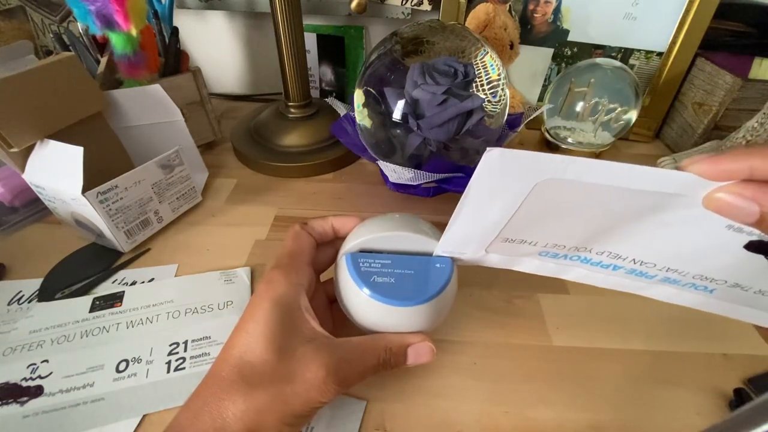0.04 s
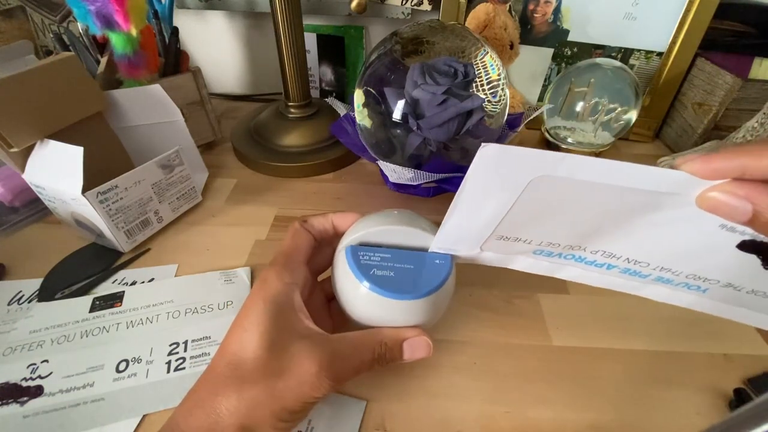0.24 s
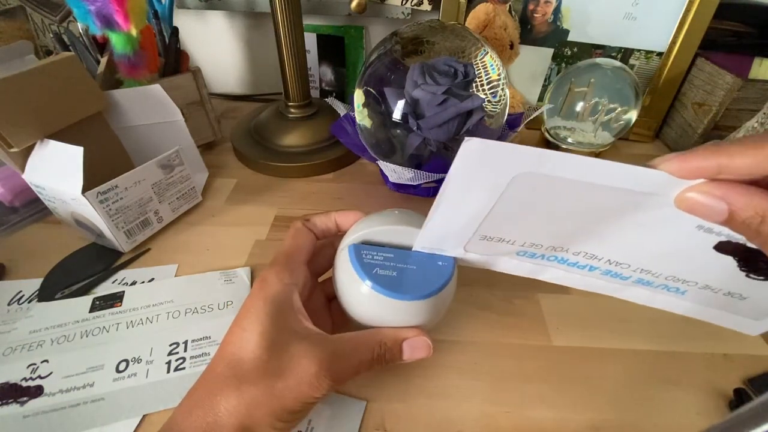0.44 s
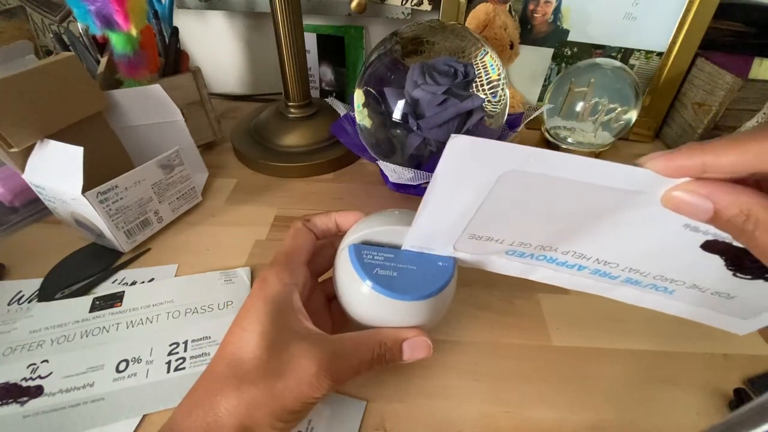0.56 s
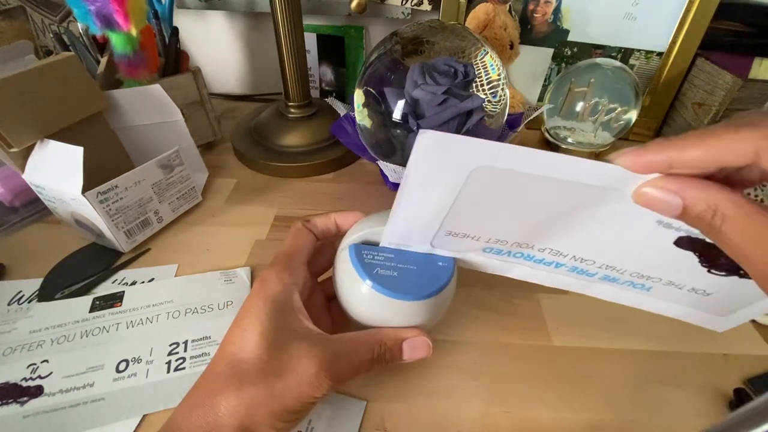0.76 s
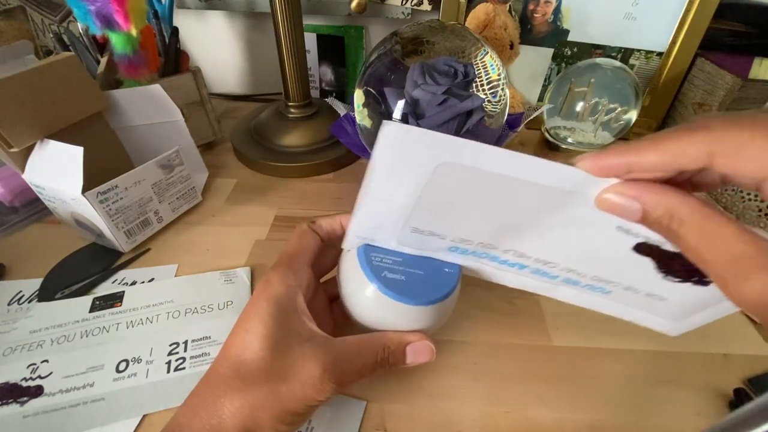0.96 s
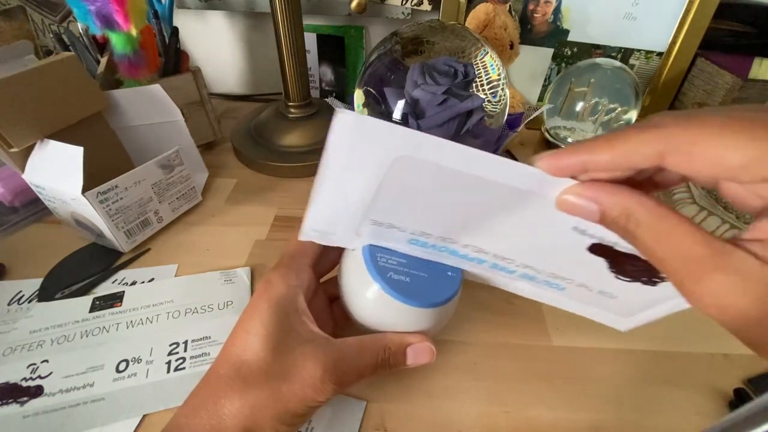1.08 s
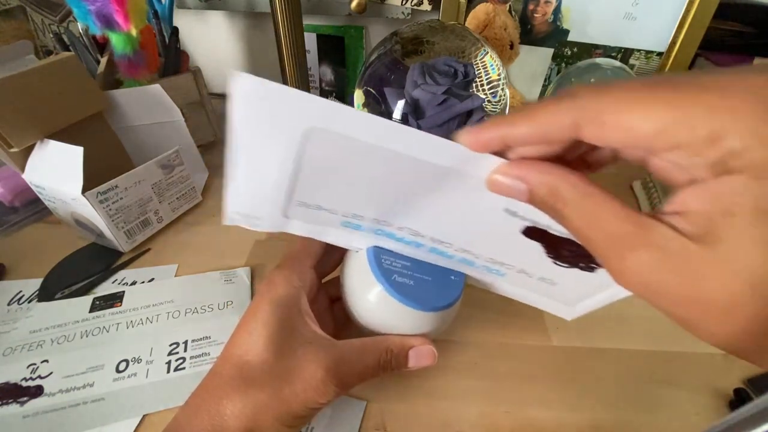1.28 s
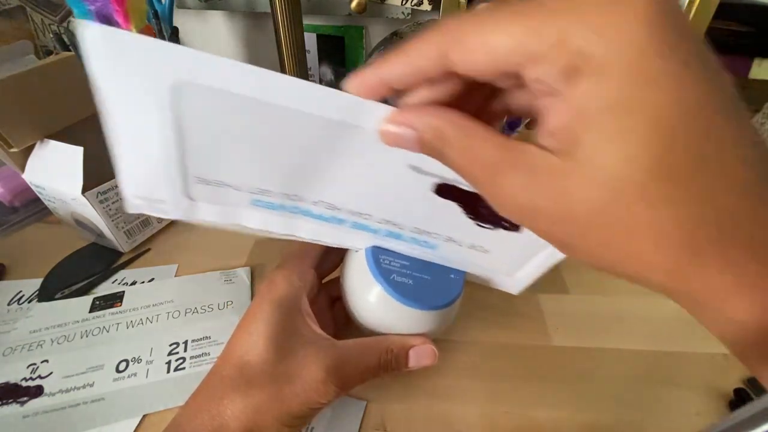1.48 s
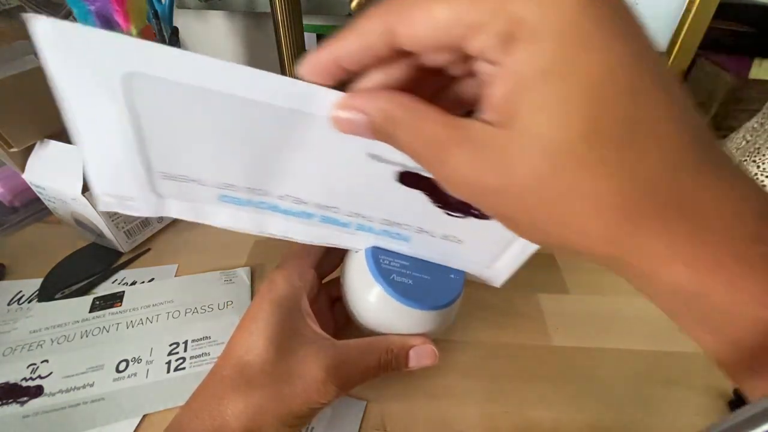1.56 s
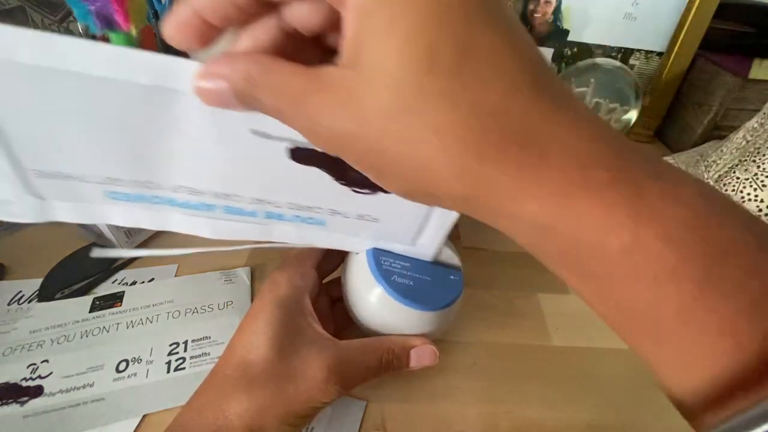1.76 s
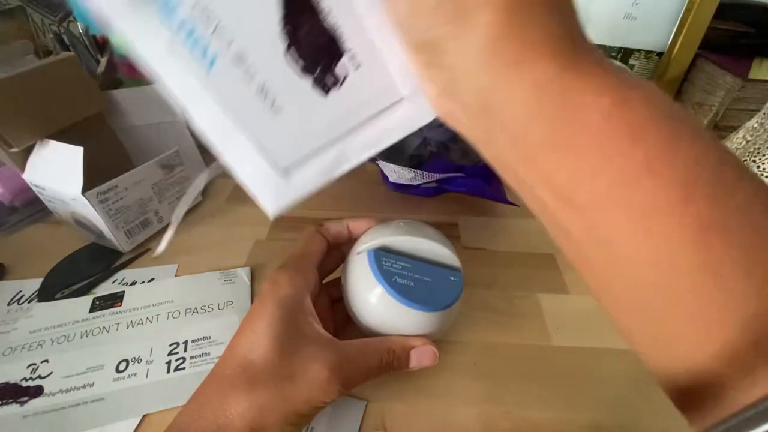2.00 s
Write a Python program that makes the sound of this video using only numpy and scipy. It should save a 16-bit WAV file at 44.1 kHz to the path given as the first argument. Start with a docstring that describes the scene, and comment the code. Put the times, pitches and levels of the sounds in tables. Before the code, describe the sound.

A small battery letter opener whirs and rattles briefly, slitting an envelope with a papery rasp.

```python
"""A faint rustle and squeak: an envelope slides into a battery letter opener, its corner knocking the slot twice.
It trips the motor; plastic gears whine and rattle in the shell, binding once per turn of the feed roller,
while noise of rubbed fibres, snaps and cracks makes the slit paper. The trailing edge swishes out, the motor slows.
Place: a wooden desk in a small room with a faint mains hum. Distance: close, the direct sound well above the room.
Microphone: stereo, with uneven treble and a steep upper limit."""
import sys
import numpy as np
from scipy import signal
from scipy.fft import rfft, irfft, next_fast_len
from scipy.io import wavfile
from scipy.ndimage import uniform_filter1d

SR = 44100
rng = np.random.default_rng(int(sys.argv[2]) if len(sys.argv) > 2 else 0)


def to_wav(s):
    """Save 16-bit WAV."""
    ch = np.atleast_2d(s).T  # columns
    pcm = np.round(np.clip(ch, -1, 1) * 32767)  # PCM
    wavfile.write(sys.argv[1], SR, pcm.astype(np.int16))


N = 89567

# --- Place and microphone
# room background colour: pitch_hz, level_db
ROOM_COLOUR = [(20, -22), (35, -13), (50, 6), (90, -4), (160, -10), (330, -13), (550, -24.5), (1500, -29),
               (6000, -40), (16000, -43)]
ROOM_DB, HUM_HZ, HUM_DB = -64.5, 121, -68.5  # HUM_DB is the middle of its waver
# microphone treble response: pitch_hz, level_db
MIC_RESPONSE = [(20, -0.5), (10300, 0.5), (11500, -12.5), (12800, -32), (13700, 5.5), (14700, 4.5),
                (15500, 0)]
TOP_HZ = 15500
# low thud as the opener shifts on the desk
BUMP_S, BUMP_LENGTH_S, BUMP_HZ, BUMP_DB = 1.015, 0.064, 48, -42.5

# --- Envelope entering the slot
# slide level: start_s, level_db
SLIDE_LEVEL = [(0, -91), (.19, -87.5), (.235, -70.5), (.31, -69.5), (.37, -71), (.45, -77), (.51, -79.5),
               (.56, -71.5), (.61, -72), (.66, -68.5), (.715, -74), (.75, -95)]
# slide colour: pitch_hz, level_db
SLIDE_COLOUR = [(200, -29), (1100, -12), (1580, -7), (2000, -8), (2650, 3), (3400, -0.5), (4500, -1.5),
                (5700, -2), (7200, -3.5), (8800, -4), (11000, -9), (16000, -17)]
# slot resonances: pitch_hz, width_hz, level_db; pitch before the rise, level before swell and slide level
SLOT_MODES = [(1590, 200, -14), (2330, 760, -8.5), (5640, 1100, -8)]
# slot resonances rise as the envelope goes deeper: start_s, frequency_ratio
SLOT_RISE = [(.22, 1.03), (.42, 1.05), (.56, 1.14), (.7, 1.17)]
# faint squeak of the entering paper's edge: start_s, level_db
SQUEAK_LEVEL = [(0, -85), (.15, -82), (.23, -75), (.38, -80), (.43, -85), (.5, -120)]
SQUEAK_HZ, SQUEAK_WIDTH_HZ = 1575, 130
# corner knocks on the slot: start_s, click_db, hollow_thump_db, ring_hz, ring_db
CORNER_TAPS = [(.388, -53, -70, 1470, -54.5), (0.635, -57, -61, 2700, -57)]

# --- Paper at the rollers and blade
# paper dragged past the blade: start_s, level_db
PAPER_LEVEL = [(.7, -120), (.724, -57), (.74, -46), (.79, -28.5), (1.3, -33), (1.86, -32.5), (1.95, -38),
               (2.03, -42.5)]
# paper colour: pitch_hz, level_db
PAPER_COLOUR = [(200, -18.5), (1100, -14), (1580, -6), (2000, 0.5), (2650, 10.5), (3400, 4), (4400, -15),
                (5700, 1.5), (7200, -17), (8800, -6.5), (11000, -22), (16000, -3)]
# the blade is in the paper between these times
CUT_FROM_S, CUT_TO_S, CUT_FADE_S = .85, 1.875, 0.024
# low flutter of the envelope while slit: pitch_hz, level_db
SHEET_COLOUR = [(60, -17), (160, -14.5), (250, 1.5), (310, -6), (390, 3), (480, -3.5), (700, -11),
                (1200, -0.5), (2000, -31), (8000, -32)]
# fibres snapping at the blade: pitch_hz, level_db
SNAP_COLOUR = [(200, -22), (1200, -6), (3000, -3), (6200, 1), (9000, 3.5), (12000, -4), (14700, 7),
               (16000, -8)]
SHEET_DB, SNAP_DB = -46, -36.5
# small cracks in the gripped paper
CRACKS_PER_S, CRACK_SPREAD_DB = 70, 4
# the trailing edge swishes out
EXIT_S, EXIT_T60_S, EXIT_HZ, EXIT_DB = 1.848, 0.29, 5800, -24
# the rollers seize the paper, then the blade bites: start_s, length_s, pitch_hz, level_db
LOAD_BITES = [(0.763, 0.012, 660, -26.5), (0.854, 0.018, 670, -27.5)]

# --- Motor, gears and shell
MOTOR_ON_S = .72
# tooth rate of the first gear, before drift and sag: start_s, tooth_rate_hz
MOTOR_SPEED = [(.722, 453.7), (.742, 1150), (.757, 1708), (.776, 2087), (.792, 2125), (.808, 2296),
               (.87, 2314), (1.05, 2307), (1.3, 2311), (1.62, 2319), (1.858, 2328), (1.878, 2052),
               (1.905, 1861), (1.94, 1452), (1.987, 1136), (2.03, 890)]
# drive level of each layer, added to that layer's own level: start_s, rattle_db, whine_db, growl_db
DRIVE_LEVEL = [(.718, -26, -50, -39), (.731, -22, -18, -4), (.741, -5, 4.5, 3.5), (.757, -2.5, -2, 0),
               (.778, 1.5, 8, 6), (.82, -0.5, 0, 1.5), (.86, -2, 0, 2), (.91, 0.5, 7, 1.5),
               (.97, 0.5, -3.5, -1.5), (1.04, -2, -1.5, -1.5), (1.1, -1.5, -8, -0.5),
               (1.19, -2.5, -3, -2.5), (1.3, -2, -3, -1.5), (1.38, -3, 2.5, -1.5), (1.45, -1.5, -4, -2),
               (1.5, -3, -4.5, 5.5), (1.57, -2, 0.5, 0), (1.66, -5, -3.5, -2), (1.73, -2.5, 0, 2),
               (1.8, -5.5, -7.5, -1.5), (1.865, -2, -9, 1.5), (1.9, -6, 2, 1), (1.93, -6.5, -6, 2),
               (1.96, -9.5, -6, 1), (1.985, -11, -4.5, -7), (2.03, -17, -12, 6)]
# drive level of the whine's octave: start_s, level_db
OCTAVE_LEVEL = [(.72, -20), (.76, 8), (.805, 7.5), (.87, 2), (.97, 3.5), (1.04, -3.5), (1.115, 8.5),
                (1.2, -5), (1.27, 1), (1.33, -21), (1.44, -3), (1.5, -20), (1.57, -3), (1.66, -20),
                (1.74, -1.5), (1.9, -13), (1.96, -6), (1.985, 7.5), (2.01, -6)]
# teeth slip more while the gears spin up
SPIN_UP_SLIP_CYCLES, SETTLED_S, SETTLE_FADE_S = .16, .82, .035
# roller binds, once a turn: start_s, length_s, whine_db, octave_db, rattle_db
ROLLER_BINDS = [(0.773, 0.002, -23, -23, 4), (0.928, 0.0036, -13.5, -15.5, -3),
                (1.078, 0.013, -27, -21.5, -4.5), (1.233, 0.0082, -19, -39, -2.5),
                (1.389, 0.0053, -21.5, -25, -3), (1.543, 0.0048, -29, -21, -9),
                (1.698, 0.0036, -17.5, -23, -7), (1.848, 0.008, -22.5, -46, -12)]
BIND_SAG, SAG_S = .008, 0.027  # fraction of speed lost, width of the dip
BIND_ATTACK_S, BIND_RELEASE_S = .0012, .003
# loose teeth chatter as the motor starts and coasts: start_s, length_s, rattle_db
LOOSE_CHATTER = [(0.734, 0.0034, -1.5), (.757, 0.0017, -8), (1.933, 0.0053, -9), (1.959, .004, -17),
                 (1.984, 0.0061, -15)]
PINION_TEETH = 13
WHEEL_TEETH = 9.35  # first-gear teeth passing per tooth of the slower stage
# whine partials, level before drive and flutter: multiple, left_db, right_db
WHINE_PARTIALS = [(1, -26, -36), (2, -35.5, -30.5)]
# plastic shell modes, level before SHELL_DB: pitch_hz, width_hz, left_db, right_db
SHELL_MODES = [(1193, 160, 10.5, 9), (1580, 12, 12, 17), (1720, 16, 4, 11.5), (2177, 210, 18.5, 16),
               (2340, 126, 16.5, 10), (2510, 19, 10, 14.5), (2714, 20, 19.5, 20.5), (3800, 116, 13.5, 10),
               (4360, 324, 15.5, 9.5), (4670, 130, 5, 15), (5020, 110, 16, -5), (6710, 670, 4.5, 6),
               (8380, 140, -17, 4.5), (9190, 98, -26, 10.5), (9800, 170, -35, 3.5)]
# colour of the tooth clicks: pitch_hz, left_db, right_db
CLICK_COLOUR = [(101, -2, -24), (242, -12, -9), (403, -0.5, 2), (850, 5, -16), (1510, -16, 1),
                (2650, -28, -2.5), (6130, 2.5, -3.5), (7570, -11, -3.5), (11260, 3, 3), (15800, -18, -16.5)]
RATTLE_DB, SHELL_DB = -27.5, -1.5
# hollow of the shell: pitch_hz, width_hz, level_db
HOLLOW_MODES = [(621, 24.3, -4.5), (710, 19, -4.5), (741.7, 24, 1.5), (838, 59, -7.5)]
# response between the hollow's resonances: pitch_hz, level_db
HOLLOW_FLOOR = [(100, -30), (2000, -25)]
GROWL_DB, GROWL_LAG_S = -33, 0.00033  # level before drive; delay at the right ear


def undb(db):
    """Decibels to gain."""
    return 10 ** (np.asarray(db) / 20)


def unit(x):
    """Scale to rms 1."""
    return x / np.sqrt(np.mean(x ** 2))


def times():
    """Time of each sample in seconds."""
    return np.arange(N) / SR


def curve(table, axis=1):
    """One column of a table, joined by straight lines in time."""
    rows = np.array(table)
    return np.interp(times(), rows[:, 0], rows[:, axis])


def swell(at, length):
    """A smooth bump of height 1."""
    return np.exp(-2 * ((times() - at) / length) ** 2)


def fade(at, t60):
    """A sudden start that dies away by 60 dB in t60 seconds."""
    return undb(-60 * np.abs(times() - at) / t60) * (times() > at)


def walk(rate):
    """Smooth random drift with rms 1; a higher rate in Hz drifts faster."""
    k = max(int(SR / rate), 2)
    return unit(uniform_filter1d(uniform_filter1d(rng.standard_normal(N), k), k))


def colour(x, points, axis=1, modes=()):
    """Causal filter through (Hz, dB) points, with resonances (Hz, width, dB) standing on top."""
    rows = np.array(points)
    size = 2 * next_fast_len(N)
    hz = np.maximum(np.arange(size // 2 + 1) * SR / size, 1)
    power = undb(np.interp(np.log(hz), np.log(rows[:, 0]), rows[:, axis])) ** 2
    for centre, width, db in modes:
        power = power + undb(db) ** 2 / (1 + ((hz ** 2 - centre ** 2) / (hz * width)) ** 2)
    # fold the cepstrum forward: minimum phase, so nothing sounds before its cause
    cepstrum = irfft(np.log(power) / 2)
    cepstrum[1:size // 2] *= 2
    cepstrum[size // 2 + 1:] = 0
    return irfft(rfft(x, size) * np.exp(rfft(cepstrum)))[..., :N]


def ring(x, hz, width):
    """One resonance, gain 1 at its centre."""
    return signal.lfilter(*signal.iirpeak(hz, hz / width, fs=SR), x)


def band(hz, width):
    """Stereo noise shaped by two resonances at one pitch, rms 1."""
    noise = rng.standard_normal((2, N))
    return unit(ring(ring(noise, hz, width), hz, 2 * width))


def half_shared_noise(apart):
    """Stereo noise: one part common to both ears, one part separate at gain `apart`."""
    return rng.standard_normal(N) + apart * rng.standard_normal((2, N))


def scatter(x, t60):
    """Dense short reflections with an even overall colour."""
    t = np.arange(8192) / SR
    paths = rfft(np.roll(rng.standard_normal(len(t)) * undb(-60 * t / t60), 1024))
    response = irfft(paths / np.abs(paths))
    return signal.fftconvolve(x, response)[1024:N + 1024]


def clicks(phase, jitter, spread_db):
    """One click per cycle of the phase, uneven in time (jitter in cycles) and size."""
    chance = rng.standard_normal((6000, 2))
    k = np.arange(1, int(phase[-1]))
    at = np.clip(np.interp(k + jitter * chance[k, 0], phase, np.arange(N)), 4, N - 6)
    size = undb(spread_db * np.clip(chance[k, 1], -2, 2))
    out = np.zeros(N)
    for tap in range(-3, 5):  # short sinc places each click between samples
        i = at.astype(int) + tap
        np.add.at(out, i, size * np.sinc(i - at))
    return unit(signal.lfilter([1, -1], [1, -.98], out))  # removes the steady offset


def drive(axis):
    """Gain of one motor layer; silent until the envelope trips the switch."""
    return undb(curve(DRIVE_LEVEL, axis=axis)) * (times() > MOTOR_ON_S)


def grip(at, length):
    """A tooth catches: quick attack, hold, short release."""
    age = times() - at
    attack = np.clip(age / BIND_ATTACK_S + .5, 0, 1)
    return attack * np.exp(-np.maximum(age - length, 0) / BIND_RELEASE_S)


def background(apart=1.0, waver_db=3):
    """Low room noise and a wavering mains hum."""
    air = unit(colour(half_shared_noise(apart), ROOM_COLOUR))
    hum = np.sqrt(2) * np.sin(2 * np.pi * HUM_HZ * times())
    return undb(ROOM_DB) * air + undb(HUM_DB + waver_db * walk(3.2)) * hum


def room(x, wet_db=-12, t60=0.078):
    """Short tail of the small furnished room: decaying noise, different at each ear."""
    t = times()[:SR // 2]
    tail = rng.standard_normal((2, len(t))) * undb(-60 * t / t60) * (t > .004)
    tail /= np.sqrt(np.sum(tail ** 2, axis=1, keepdims=True))
    return x + undb(wet_db) * signal.fftconvolve(x, tail, axes=1)[:, :N]


def desk(rumble_db=-61, rumble_hz=110, width_hz=170):
    """The running opener shakes the desk in a low resonance, with one low thud as it shifts."""
    rumble = ring(ring(rng.standard_normal(N), rumble_hz, width_hz), rumble_hz, width_hz)
    rumble = unit(rumble) * undb(rumble_db) * drive(axis=1)
    thud = np.sin(2 * np.pi * BUMP_HZ * times()) + 0.5 * unit(ring(rng.standard_normal(N), 101, 54))
    thud = thud * np.exp(-((times() - BUMP_S) / BUMP_LENGTH_S) ** 4)
    return rumble + undb(BUMP_DB) * thud


def slide(grain_db=1.0, swell_db=4.0):
    """The envelope rustles and squeaks into the slot, whose resonances rise as it fills."""
    turn = 2 * np.pi * np.cumsum(curve(SLOT_RISE)) / SR
    sides = []
    for _ in range(2):
        fibres = rng.standard_normal(N) * undb(grain_db * walk(1500))
        rustle = unit(colour(scatter(fibres, t60=0.0028), SLIDE_COLOUR))
        slot = 0
        for hz, width, db in SLOT_MODES:
            level = undb(db + swell_db * walk(20))
            # two slow random parts on a carrier: a noise band that can glide
            tone = walk(width) * np.cos(hz * turn) + walk(width) * np.sin(hz * turn)
            slot = slot + level * unit(tone)
        sides.append(rustle + slot)
    squeak = band(SQUEAK_HZ, SQUEAK_WIDTH_HZ) * undb(curve(SQUEAK_LEVEL))
    return np.array(sides) * undb(curve(SLIDE_LEVEL)) + squeak


def ticks(click_hz=4300, click_width_hz=5000, click_t60=0.024, ring_width_hz=450, ring_t60=0.029):
    """The envelope's corner strikes the slot: a sharp click and a short ring."""
    out = np.zeros((2, N))
    for at, click_db, _, hz, ring_db in CORNER_TAPS:
        out += band(click_hz, click_width_hz) * undb(click_db) * fade(at, click_t60)
        out += band(hz, ring_width_hz) * undb(ring_db) * fade(at, ring_t60)
    return out


def paper(grain_db=4.5, rough_db=2.5, exit_width_hz=2200):
    """The envelope's fibres rub hard past the blade; its trailing edge swishes out of the slot."""
    fibres = unit(rng.standard_normal(N) * undb(grain_db * walk(1500) + rough_db * walk(83)))
    rub = np.array([unit(colour(scatter(fibres, t60=0.015), PAPER_COLOUR)) for _ in range(2)])
    swish = band(EXIT_HZ, exit_width_hz) * undb(EXIT_DB) * fade(EXIT_S, EXIT_T60_S)
    return rub * undb(curve(PAPER_LEVEL)) + swish


def crackle(level_db=-39.5, hz=5200, width_hz=8000):
    """The gripped paper creases and tears in separate small cracks."""
    sizes = undb(CRACK_SPREAD_DB * np.minimum(rng.exponential(size=N), 2))
    cracks = (rng.random(N) < CRACKS_PER_S / SR) * sizes
    sides = np.array([ring(scatter(cracks, t60=0.0072), hz, width_hz) for _ in range(2)])
    return unit(sides) * undb(level_db) * drive(axis=1)


def slit(snaps_per_s=500, snap_spread_db=2.5, apart=0.72):
    """The blade in the paper: the sheet flutters low and fibres snap at random moments and sizes."""
    t = times()
    cutting = np.clip((t - CUT_FROM_S) / CUT_FADE_S + .5, 0, 1)
    cutting = cutting * np.clip((CUT_TO_S - t) / CUT_FADE_S + .5, 0, 1)
    sheet = unit(colour(half_shared_noise(apart), SHEET_COLOUR))
    sizes = undb(snap_spread_db * np.minimum(rng.exponential(size=N), 4))
    snaps = (rng.random(N) < snaps_per_s / SR) * sizes
    snaps = np.array([unit(colour(scatter(snaps, t60=0.0053), SNAP_COLOUR)) for _ in range(2)])
    return cutting * (undb(SHEET_DB) * sheet + undb(SNAP_DB) * snaps)


def bites(width_hz=130):
    """Two short, low groans of the shell under sudden load, later at the right ear."""
    groan = np.zeros(N)
    for at, length, hz, db in LOAD_BITES:
        tone = unit(ring(ring(rng.standard_normal(N), hz, width_hz), hz, 2 * width_hz))
        groan += tone * undb(db) * swell(at, length)
    return np.array([groan, np.interp(times() - GROWL_LAG_S, times(), groan)])


def sizzle(level_db=-43, hz=14600, width_hz=1500, burst_db=5, apart=0.35):
    """A thin, very high sizzle comes in brief bursts while the motor runs."""
    bursts = undb(burst_db * np.clip(walk(260), -3, 3))
    hiss = ring(ring(half_shared_noise(apart), hz, width_hz), hz, width_hz)
    return unit(hiss * bursts) * undb(level_db) * drive(axis=1)


def growl(teeth, balance_db=1, tap_t60=0.23):
    """The slower gears, and before them the envelope, knock on the hollow of the shell, nearer the left ear."""
    knocks = scatter(clicks(teeth / WHEEL_TEETH, jitter=0.294, spread_db=4), t60=0.0176)
    body = unit(colour(knocks, HOLLOW_FLOOR, modes=HOLLOW_MODES))
    body = unit(ring(ring(body, 734, 410), 734, 410))
    taps = sum(undb(thump_db) * fade(at, tap_t60) for at, _, thump_db, _, _ in CORNER_TAPS)
    body = body * (undb(GROWL_DB) * drive(axis=3) + taps)
    return np.array([body * undb(balance_db), np.interp(times() - GROWL_LAG_S, times(), body)])


def rattle(teeth, wobble, flutter_db=0.82, shared=0.57, lag_s=0.00018):
    """Tooth clicks with backlash ring the shell's modes, harder at each bind; some reach both ears, some one."""
    force = drive(axis=1) * wobble * undb(flutter_db * walk(67))
    for row in ROLLER_BINDS + LOOSE_CHATTER:
        force = force + undb(row[-1]) * grip(row[0], row[1])

    def contact():
        """One independent set of tooth contacts."""
        return scatter(clicks(teeth, jitter=0.3064, spread_db=2) * force, t60=0.00792)

    common = contact()
    sides = []
    for side in range(2):
        delayed = np.interp(times() - side * lag_s, times(), common)
        hits = (contact() + shared * delayed) / np.hypot(1, shared)
        modes = [(row[0], row[1], row[2 + side] + SHELL_DB) for row in SHELL_MODES]
        sides.append(colour(hits, CLICK_COLOUR, axis=1 + side, modes=modes))
    return undb(RATTLE_DB) * np.array(sides)


def whine(teeth, hz, wobble, flutter_db=4, slip=0.078, loose_slip=0.084,
          off_resonance_db=-9, resonance_hz=2250, width_hz=300):
    """Rough gear tone and octave: favoured near the shell's resonance, ragged at spin-up, squealing at binds."""
    def near(f):
        """Closeness to the shell's main resonance, 0 to 1."""
        return np.exp(-((f - resonance_hz) / width_hz) ** 2)

    unsettled = np.clip((SETTLED_S - times()) / SETTLE_FADE_S, 0, 1)
    slack = slip + loose_slip * (1 - near(hz)) + SPIN_UP_SLIP_CYCLES * unsettled  # cycles
    levels = [drive(axis=2), undb(curve(OCTAVE_LEVEL)) * (times() > MOTOR_ON_S)]
    out = np.zeros((2, N))
    for k, (_, left_db, right_db) in enumerate(WHINE_PARTIALS, 1):
        off_resonance = 1 - np.minimum(near(k * hz) + near(hz), 1)
        level = wobble * levels[k - 1] * undb(off_resonance_db * off_resonance)
        squeal = sum(undb(row[1 + k]) * grip(row[0], row[1]) for row in ROLLER_BINDS)
        gains = undb([left_db, right_db])
        phase = k * teeth + np.sqrt(k) * slack * walk(306)
        for side in range(2):
            # the right ear sits a quarter cycle ahead
            tone = np.sqrt(2) * np.sin(2 * np.pi * (phase + side / 4 + 0.049 * walk(62)))
            steady = gains[side] * undb(flutter_db * walk(89)) * level
            out[side] += tone * (steady + unit(gains)[side] * squeal)
    return out


def scene(shaft_depth=0.097, wheel_depth=0.2, drift=.011):
    """One motor speed drives all gears; off-centre wheels make their force throb."""
    sag = BIND_SAG * sum(swell(row[0], SAG_S) for row in ROLLER_BINDS)
    hz = curve(MOTOR_SPEED) * (1 + drift * walk(40.05) - sag)
    teeth = np.cumsum(hz) / SR  # first-gear teeth passed so far
    shaft = shaft_depth * np.sin(2 * np.pi * teeth / PINION_TEETH)
    wheel = wheel_depth * np.sin(2 * np.pi * teeth / WHEEL_TEETH)
    wobble = 1 + shaft + wheel
    envelope = slide() + ticks() + paper() + crackle() + slit()
    opener = bites() + sizzle() + growl(teeth) + rattle(teeth, wobble) + whine(teeth, hz, wobble)
    return background() + desk() + room(envelope + opener)


def record(dry):
    """The microphone's uneven treble and its steep upper limit."""
    upper_limit = signal.ellip(10, .2, 80, TOP_HZ, fs=SR, output="sos")
    return signal.sosfilt(upper_limit, colour(dry, MIC_RESPONSE))


dry = scene()
out = record(dry)
to_wav(out)
```